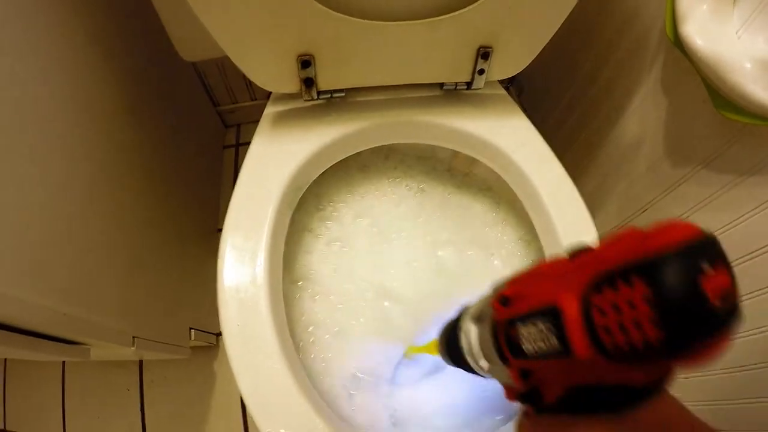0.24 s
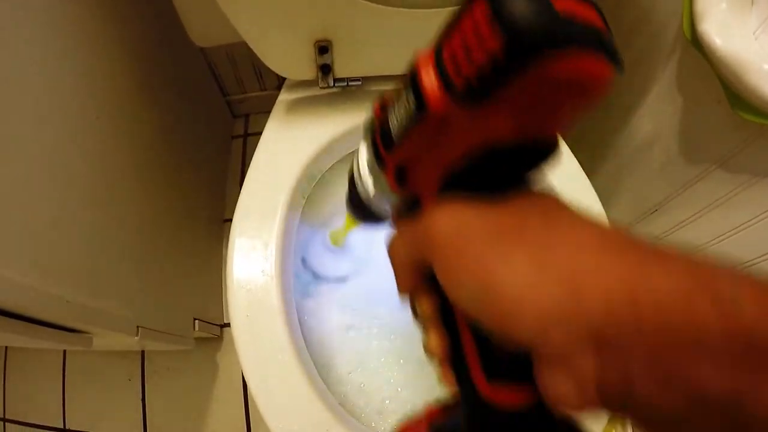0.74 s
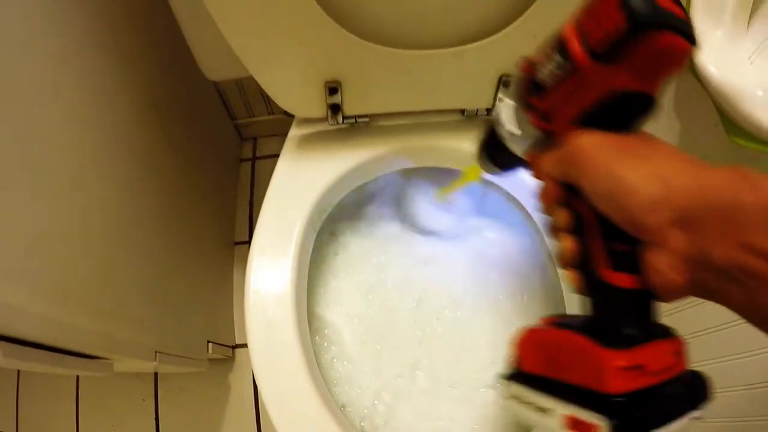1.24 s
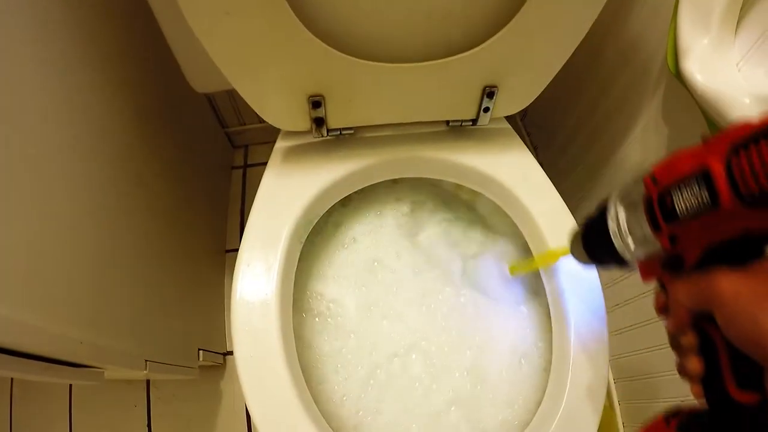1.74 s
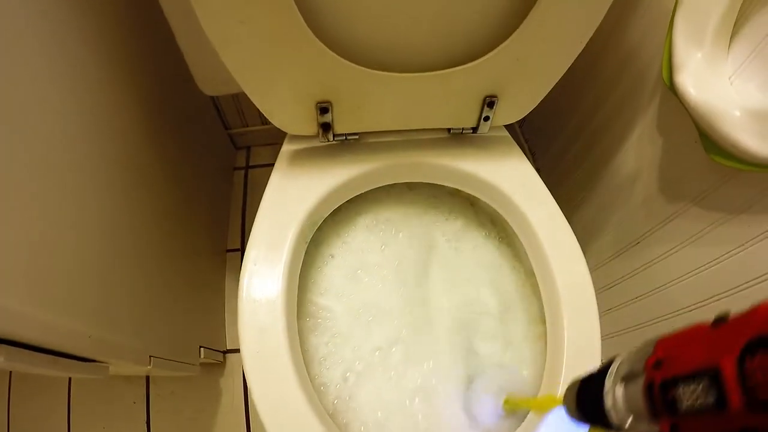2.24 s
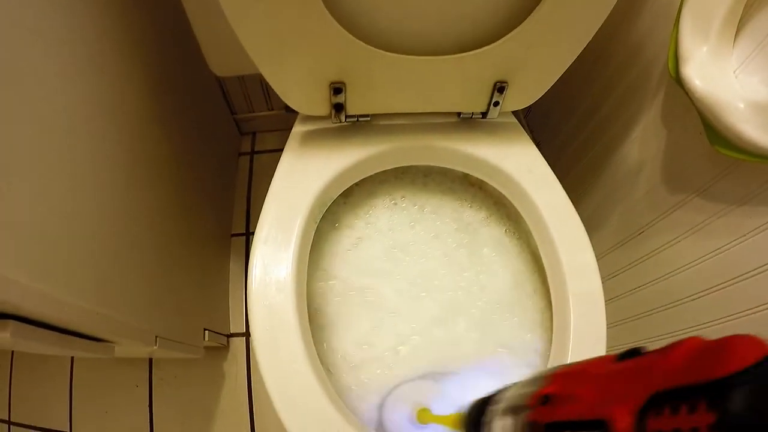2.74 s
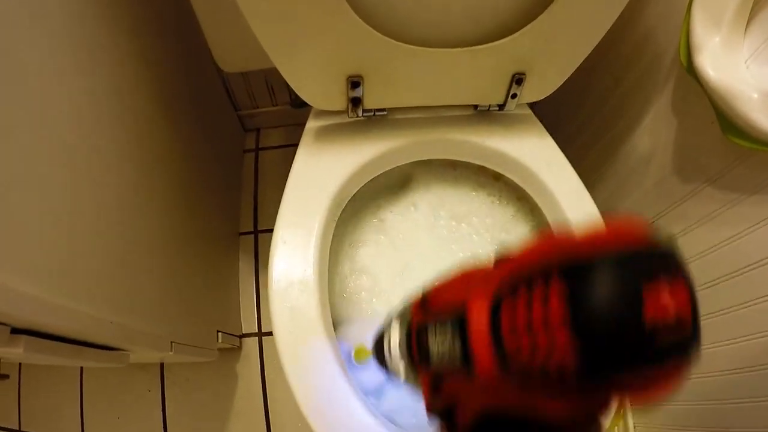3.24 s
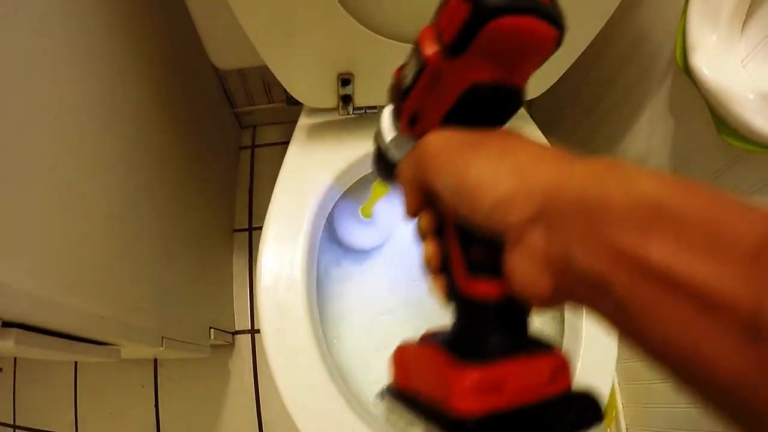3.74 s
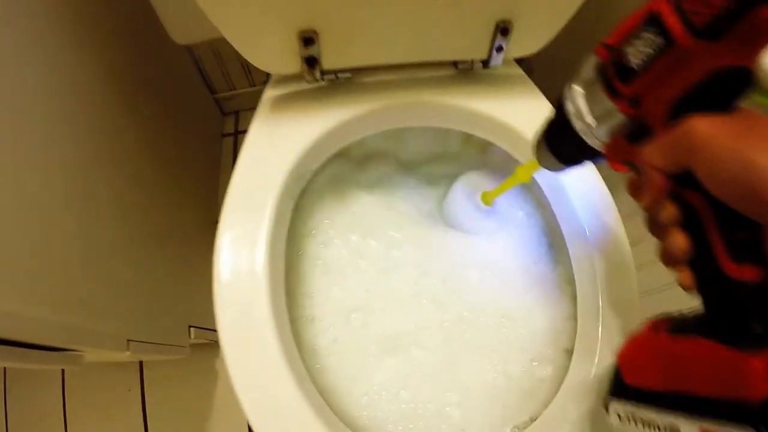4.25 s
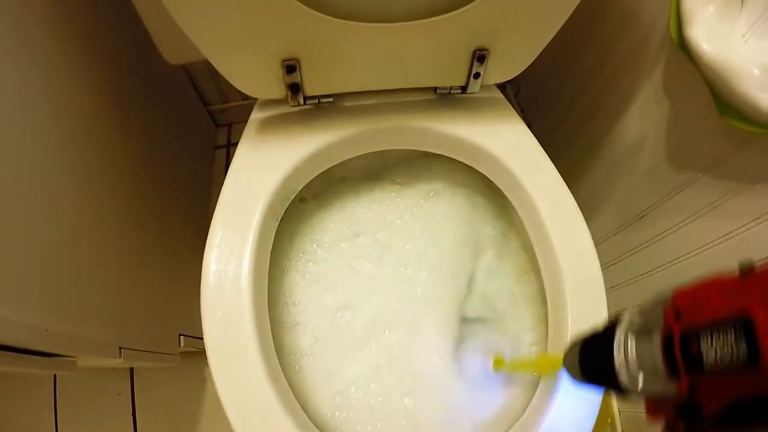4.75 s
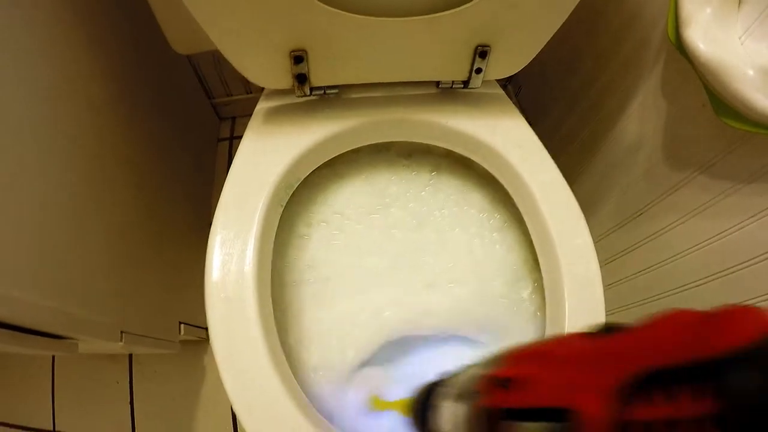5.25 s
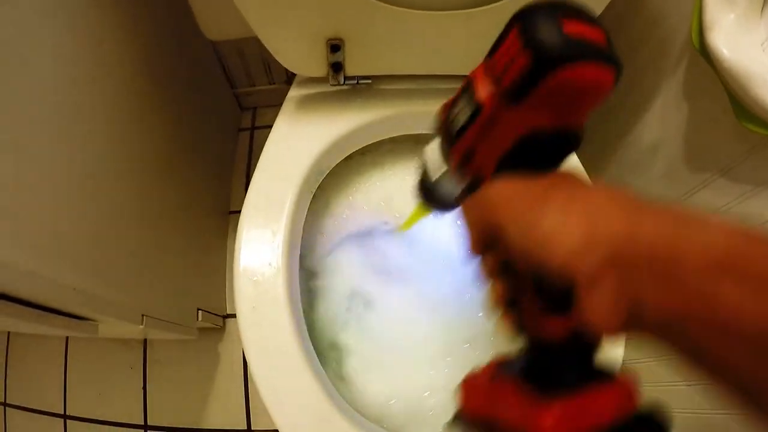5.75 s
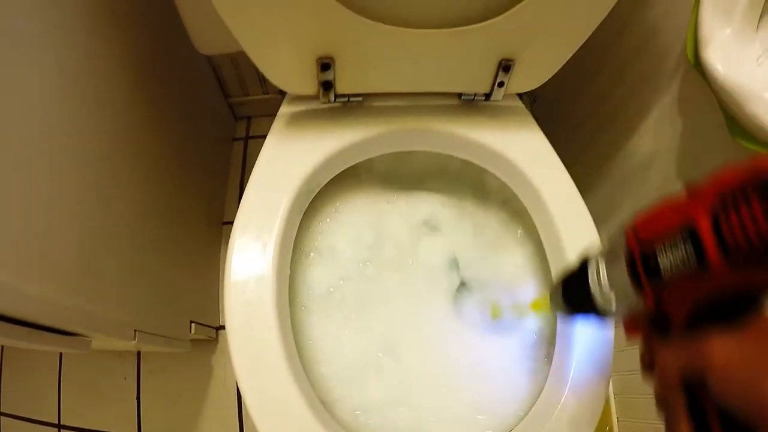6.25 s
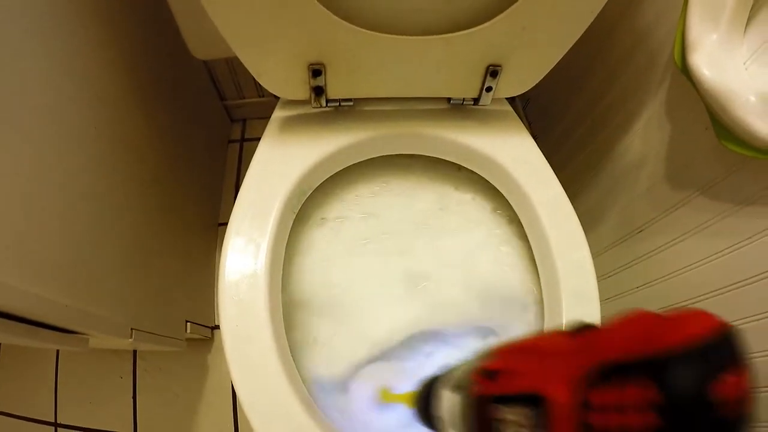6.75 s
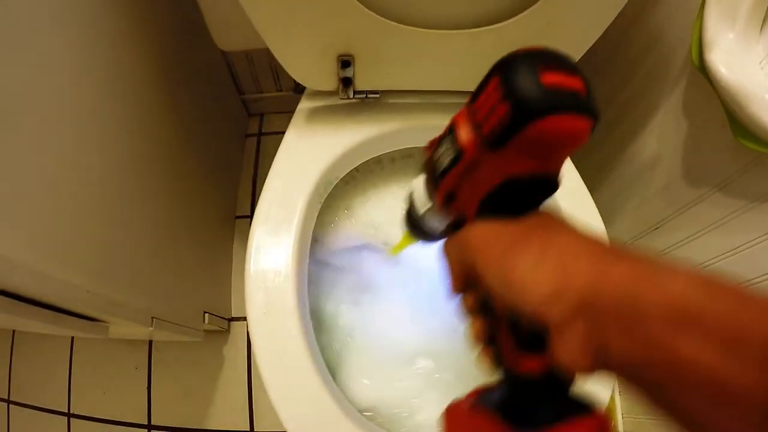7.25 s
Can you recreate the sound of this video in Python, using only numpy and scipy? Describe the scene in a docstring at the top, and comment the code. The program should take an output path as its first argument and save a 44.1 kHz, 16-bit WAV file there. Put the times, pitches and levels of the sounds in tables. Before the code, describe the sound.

A cordless drill whines steadily at high speed over a rough throbbing roar, while foamy water sloshes and gulps in a toilet bowl.

```python
"""The whine of a cordless drill, spinning a brush round a foam-filled toilet bowl, over a broad throbbing roar.
Place: a small bathroom, one microphone. The whine is sines on multiples of the rotor speed, from motor and gears;
the roar of gears, fan and bristles is coloured noise that swells once per brush turn. Water gulps as random
pushes ring the air in the bowl. Behind it lie a low noise rumble that comes and goes, and soft thuds."""
import sys
import numpy as np
from scipy import signal
from scipy.fft import irfft
from scipy.io import wavfile

SR = 44100
rng = np.random.default_rng(int(sys.argv[2]) if len(sys.argv) > 2 else 0)


def master(y):
    """Save y as 16-bit WAV."""
    cut = np.clip(np.atleast_2d(y).T, -1, 1)
    pcm = np.round(cut * 32767)  # scale
    wavfile.write(sys.argv[1], SR, pcm.astype(np.int16))


N = 330750  # 7.5 s

# Rotor speed, sagging when the brush presses on the bowl: (time [s], speed [turns per s])
ROTOR_SPEED = [(0.0, 399.9), (0.25, 407.7), (0.6, 408.5), (0.8, 409.6), (1.05, 402.3), (1.3, 403.1),
               (1.5, 397.0), (1.55, 396.9), (1.75, 401.2), (2.05, 395.8), (2.3, 401.1), (2.55, 399.7),
               (2.7, 404.3), (2.8, 405.8), (3.1, 404.6), (3.3, 409.4), (3.45, 409.7), (4.4, 401.6),
               (4.6, 397.0), (4.7, 399.0), (4.95, 396.8), (5.3, 408.6), (5.5, 406.5), (5.65, 409.0),
               (5.8, 406.8), (6.15, 399.6), (6.55, 397.4), (6.6, 398.4), (6.85, 408.5), (7.25, 407.7),
               (7.45, 404.2)]
# Place of the brush, 0 = near rim, .25 left, .5 far rim, .75 right: (time [s], laps of the bowl [turns])
BOWL_LAP = [(0.0, 0.04), (0.7, 0.29), (1.85, 0.64), (2.7, 1.02), (3.45, 1.16), (4.55, 1.66), (5.2, 2.04),
            (5.95, 2.43), (6.65, 3.01), (7.5, 3.43)]
BRUSH_PER_ROTOR = .0566  # brush turns per rotor turn

# Strongest whines, swelling and dropping out as the drill is swung round.
# Their pitches, gear mesh first, then four of the commutator: (multiples of rotor speed)
STRONG_ORDERS = (5.547, 3, 6, 9, 12)
# Gear mesh, x5.547, before its flicker and pulse: (time [s], level [dB])
GEAR_MESH_LEVEL = [(0.0, -37), (0.65, -28.8), (0.9, -40.8), (1.05, -25), (1.4, -37), (1.6, -28), (2.2, -49),
                   (2.4, -30.8), (2.8, -26), (3.0, -47), (3.6, -28.5), (4.2, -36.5), (6.0, -34.7),
                   (6.25, -47.9), (6.6, -33.5), (7.05, -33), (7.45, -41)]
# Commutator bars, x3, before flicker: (time [s], level [dB])
COMMUTATOR_3 = [(0, -36.5), (.6, -39.5), (1.3, -36.5), (1.84, -30), (1.96, -36), (3.2, -33.5),
                (3.36, -41.5), (4.1, -33.5), (4.55, -33), (5.1, -35.5), (5.54, -40.5), (5.83, -31.5),
                (6.6, -32), (6.85, -45), (7.3, -32.5), (7.5, -36)]
# Commutator bars, x6, before flicker: (time [s], level [dB])
COMMUTATOR_6 = [(0.0, -28.5), (0.65, -22), (1.25, -32), (1.35, -21.5), (1.5, -33), (2.0, -33),
                (2.25, -26.5), (2.75, -31.4), (3.25, -29.8), (3.5, -21), (3.65, -30.5), (4.25, -24.5),
                (4.55, -38.9), (4.7, -26), (5.3, -31.3), (5.65, -27.5), (6.05, -23.5), (6.25, -42),
                (6.35, -23.5), (6.6, -26.8), (6.9, -40.0), (7.15, -23), (7.3, -31.2), (7.45, -25.1)]
# Commutator bars, x9, before flicker: (time [s], level [dB])
COMMUTATOR_9 = [(0.0, -30), (1.65, -36.5), (1.8, -42.2), (2.5, -33.5), (2.55, -29.8), (2.95, -38),
                (3.1, -29.5), (4.85, -39), (4.9, -42), (5.05, -27), (5.2, -37.1), (5.75, -46), (5.8, -32),
                (6.15, -27.5), (6.5, -42), (6.6, -27.5), (6.95, -38), (7.45, -36)]
# Commutator bars, x12, before flicker: (time [s], level [dB])
COMMUTATOR_12 = [(0.0, -27.5), (1.3, -41), (1.4, -34), (1.6, -29.9), (2.25, -35.7), (2.45, -26.5),
                 (2.75, -34.3), (3.55, -34), (3.75, -37), (4.1, -23), (4.35, -35), (4.4, -28.1),
                 (5.05, -26), (5.5, -37.4), (5.6, -30), (5.85, -30), (6.0, -49), (6.15, -26), (6.3, -40),
                 (6.4, -32), (6.75, -30), (7.45, -35.3)]

# Whines that depend on how the drill faces; their pitches: (multiples of rotor speed)
FACING_ORDERS = (1, 13.633, 24, 2.773, 4)
# Their levels, one row per pitch: (mean [dB], swing once a lap [dB], where highest [turn],
# swing twice a lap [dB], where highest [turn])
FACING_LEVELS = [(-48.5, 6.4, 0.3, 1.2, 0.19), (-37, 2.1, 0.81, .6, 0.44), (-41.5, 2.7, 0.67, 3.4, 0.47),
                 (-45, 4, 0.66, .5, 0.22), (-42, 4.5, .12, .5, .1)]
FACING_WAVER_DB = 1  # spread of their chance fading
# Weaker whines of rotor and gears: (multiple of rotor speed, level before a 2 dB cut and chance fading [dB])
FAINT_WHINES = [(2.07, -46), (7.781, -40), (8.086, -39.5), (8.141, -39.5), (8.32, -41), (10.867, -43),
                (13, -42), (15, -42), (18, -45), (19, -46), (21, -42), (27, -45), (30, -46), (31, -49),
                (33, -46),]

# Roar by place in the bowl; rows: level before overall gain, lift near 1 kHz, lift near 6 kHz:
# (mean [dB], swing once a lap [dB], where highest [turn], swing twice a lap [dB], where highest [turn])
ROAR_BY_PLACE = [(-21, 0.14, 0.66, 0.14, 0.23), (-0.5, 2.3, 0.76, 0.24, .06),
                 (-0.04, 0.91, 0.14, 0.13, .21)]
# Relative colour of the roar: (frequency [Hz], density [dB per Hz])
ROAR_SPECTRUM = [(40, -40), (160, -19.5), (300, -23), (450, -13), (900, -6.5), (1900, -5.5), (2500, -3.5),
                 (4000, -3), (5500, -5.5), (6900, -9.5), (10000, -11.5), (12500, -18.5), (15300, -17)]
# Resonances of the drill shell: (frequency [Hz], width [Hz], gain on top [dB])
SHELL_MODES = [(900, 59, 4), (1695, 160, 2.5), (2192, 130, 4.5), (2595, 480, 5.5), (3255, 180, 3),
               (5410, 250, 6.5)]
# Brush running off centre; rows: shake at brush speed, depth of the throb:
# (mean [dB], swing once a lap [dB], where highest [turn], swing twice a lap [dB], where highest [turn])
OFF_CENTRE = [(-49, 4.3, 0.25, 8, 0.427), (0.72, 0.19, .02, 0.32, .46)]
# Hiss near 14 kHz that swells when the fan vents face up: peak level, place and spread
VENT_DB, VENT_TURN, VENT_SPREAD_TURN = -33, 0.62, 0.15

# Water and rumble, levels before a fixed trim in each layer:
# (time [s], slosh [dB], deep slosh near 110 Hz [dB], low rumble [dB])
WATER_AND_RUMBLE = [(0, -33.5, -42, -52), (.58, -34, -34, -49), (.7, -41, -48.5, -51),
                    (1.7, -47.5, -47, -57), (2.6, -46.5, -48.5, -48), (3.2, -45.5, -47, -55),
                    (5.1, -43, -46.5, -55), (5.6, -44.5, -43.5, -50), (5.85, -33.5, -43, -55),
                    (6.5, -36.5, -42.5, -52), (6.9, -42, -50, -49), (7.2, -39, -41, -56),
                    (7.5, -29, -36, -53)]
# Air modes of the bowl: (frequency [Hz], width of the first filter [Hz], relative level [dB])
BOWL_MODES = [(214, 38, -1.5), (264.6, 27, -3.5), (319.5, 66, -1)]
DEEP_HZ, DEEP_WIDTH_HZ = 103, 30
# Single loud gulps: (time, about 2 ms after the envelope peak [s], peak before a 9.5 dB cut [dB], pitch [Hz])
LOUD_GULPS = [(0.159, -19, 320), (0.516, -22, 315), (5.768, -25, 242), (5.905, -15, 319), (6.005, -25, 228),
              (6.321, -21, 324), (6.509, -22, 233), (6.735, -24, 310), (7.263, -26, 312), (7.336, -19, 270)]
# Soft low thuds: (time of peak [s], peak level [dB])
SOFT_THUDS = [(2.443, -26), (4.991, -23), (5.151, -25), (5.218, -29), (6.468, -23), (6.509, -27.5),
              (6.622, -26), (6.692, -32)]
CUTOFF_HZ = 15330


def whine(rotor, fade_db, flicker_db, jitter_rad):
    """Sines locked to a shivering rotor angle; strong and facing gear whines pulse once per brush turn,
    the faint whines only fade by chance."""
    angle = rotor + jitter_rad * drift(23)
    orders = STRONG_ORDERS + FACING_ORDERS
    start = rng.uniform(0, 2 * np.pi, len(FAINT_WHINES) + len(orders))
    # same order as STRONG_ORDERS
    curves = (GEAR_MESH_LEVEL, COMMUTATOR_3, COMMUTATOR_6, COMMUTATOR_9, COMMUTATOR_12)
    strong = [in_time(curve)[0] for curve in curves]
    facing = [db + FACING_WAVER_DB * drift(2.5) for db in round_bowl(FACING_LEVELS)]
    out = np.zeros(N)
    for order, db, phase in zip(orders, strong + facing, start):
        flicker = flicker_db * np.sqrt(order) * drift(8)
        geared = order % 1 > 0  # of these, the gear pitches with broken multiples
        pulse = geared * 3 * throb(rotor)
        out += from_db(db + flicker + pulse) * np.sin(order * angle + phase)
    for (order, db), phase in zip(FAINT_WHINES, start[::-1]):
        out += from_db(db - 2 + fade_db * drift(5)) * np.sin(order * angle + phase)
    return np.sqrt(2) * out  # table levels are rms


def roar(rotor, patchy_db):
    """Gears, fan and bristles: noise in third-octave patches, coloured by the shell, throbbing with the turn."""
    level_db, low_lift_db, high_lift_db = round_bowl(ROAR_BY_PLACE)
    planet_db = .5 * np.cos(8 * BRUSH_PER_ROTOR * rotor)
    commutator_db = 0.37 * np.cos(3 * rotor)
    beat_db = throb(rotor)
    edges = 40 * 2 ** (np.arange(27) / 3)
    grain = rng.standard_normal((2, N))  # neighbouring bands take separate noises
    grain = grain + from_db(-4) * chatter(rotor, fade_db=4, count=10)
    hz_at, db_at = np.transpose(ROAR_SPECTRUM)
    out, neighbour = np.zeros(N), drift(1.2)
    for k, (low, high) in enumerate(zip(edges, edges[1:])):
        hz = np.sqrt(low * high)
        own = drift(1.07)
        db = np.interp(np.log(hz), np.log(hz_at), db_at)
        db = db + patchy_db * (own + neighbour) + 0.75 * drift(15.6)
        db += nearness(hz, 980, 0.06) * low_lift_db
        db += nearness(hz, 5460, 0.64) * high_lift_db
        db += nearness(hz, 2820, 3.8) * beat_db  # the gears throb most
        out += from_db(db) * band(grain[k % 2], low, high)
        neighbour = own
    out = out + sum((from_db(db) - 1) * resonance(out, hz, width_hz) for hz, width_hz, db in SHELL_MODES)
    return from_db(level_db + planet_db + commutator_db + 3.5) * rms_one(out) + vent_hiss()


def nearness(hz, centre_hz, spread):
    """Bell over log frequency, 1 at the centre; spread in octaves squared."""
    return np.exp(-np.log2(hz / centre_hz) ** 2 / spread)


def throb(rotor):
    """The off-centre brush gives a swell once per turn, sharpened on top by a second harmonic, in dB."""
    turn = BRUSH_PER_ROTOR * rotor - 1.6
    return round_bowl(OFF_CENTRE)[1] * (np.cos(turn) + 0.54 * np.cos(2 * turn))


def chatter(rotor, fade_db, count):
    """Tooth errors repeat every brush turn: sets of scattered thin lines, each set fading by chance."""
    turn = BRUSH_PER_ROTOR * rotor / (2 * np.pi) % 1
    steps = (turn * 2 ** 15).astype(int)
    out = np.zeros(N)
    for _ in range(count):
        chosen = rng.random(2 ** 14 + 1) < 1 / 60
        lines = chosen * np.exp(2j * np.pi * rng.random(2 ** 14 + 1))
        lines[660:] = 0  # only multiples of the brush speed below 660
        one_turn = irfft(lines)
        out += from_db(fade_db * drift(3.0)) * one_turn[steps]
    return rms_one(out)


def vent_hiss():
    """Fan air: narrow noise near 14 kHz, swelling once a lap when the vents face up."""
    hiss = resonance(resonance(rng.standard_normal(N), 14000, 2000), 14000, 2000)
    off_turn = in_time(BOWL_LAP)[0] % 1 - VENT_TURN
    swell = from_db(VENT_DB) * np.exp(-(off_turn / VENT_SPREAD_TURN) ** 2)
    return swell * rms_one(hiss)


def water(per_s):
    """Air pockets under the foam push the air in the bowl, which rings in its modes; a few gulp loudly."""
    slosh_db, deep_db, _ = in_time(WATER_AND_RUMBLE)
    # sparse random impulses in four rows; the tiny offset avoids silence
    pushes = rng.standard_normal(N) * (rng.random((4, N)) < per_s / SR) + 1e-18
    slosh = np.zeros(N)
    for push, (hz, width_hz, db) in zip(pushes, BOWL_MODES):
        slosh += from_db(db) * rms_one(ring(push, hz, width_hz))
    deep = ring(pushes[-1], DEEP_HZ, DEEP_WIDTH_HZ)
    out = from_db(slosh_db - 2.5) * rms_one(slosh) + from_db(deep_db - 3.5) * rms_one(deep)
    seconds = np.arange(SR // 10) / SR
    age = seconds / 0.01  # in units of the 10 ms swell time
    for s, db, hz in LOUD_GULPS:
        at = round(s * SR - .012 * SR)
        gulp = from_db(db - 9.5) * age * np.exp(1 - age) * np.sin(2 * np.pi * hz * seconds)
        out[at:at + len(age)] += gulp[:N - at]
    return out


def ring(push, hz, width_hz):
    """An air mode as two resonances in a row, the second twice as wide."""
    return resonance(resonance(push, hz, width_hz), hz, 2 * width_hz)


def rumble(rotor):
    """The off-centre brush shakes at its own speed, over low noise and soft thuds of one slow cycle."""
    shake = np.sqrt(2) * from_db(round_bowl(OFF_CENTRE)[0]) * np.sin(BRUSH_PER_ROTOR * rotor)
    low_noise = rms_one(band(rng.standard_normal(N), 13, 71))
    out = shake + from_db(in_time(WATER_AND_RUMBLE)[2] + 1.0) * low_noise
    u = np.arange(-2000, 2000) / SR / 0.0069  # in units of 6.9 ms
    for s, db in SOFT_THUDS:
        at = round(s * SR) - 2000
        out[at:at + len(u)] += from_db(db) * (1 - u ** 2) * np.exp(-u ** 2 / 2)
    return out


def round_bowl(rows):
    """Quantities that rise and fall with the place of the brush in the bowl."""
    lap = 2 * np.pi * in_time(BOWL_LAP)[0]
    return [mean + once * np.cos(lap - 2 * np.pi * at) + twice * np.cos(2 * lap - 4 * np.pi * at2)
            for mean, once, at, twice, at2 in rows]


def in_time(rows):
    """Columns of a table after its time column, one value per sample."""
    s, *columns = np.transpose(rows)
    return [np.interp(np.arange(N) / SR, s, c) for c in columns]


def drift(rate_hz):
    """Slow chance: coarse noise through a double one-pole low-pass, spread 1."""
    r = np.exp(-80 * np.pi * rate_hz / SR)  # one coarse step is 40 samples
    noise = rng.standard_normal(N // 40 + 2002)
    slow = signal.lfilter([1], [1, -2 * r, r * r], noise)[2000:]  # drop the filter's run-in
    return np.interp(np.arange(N) / 40, np.arange(len(slow)), rms_one(slow - slow.mean()))


def resonance(x, hz, width_hz):
    """Two-pole band-pass, gain 1 on top."""
    r = np.exp(-np.pi * width_hz / SR)
    poles = [1, -2 * r * np.cos(2 * np.pi * hz / SR), r * r]
    return signal.lfilter([(1 - r * r) / 2, 0, (r * r - 1) / 2], poles, x)


def band(x, low_hz, high_hz):
    """Butterworth band-pass."""
    return signal.sosfilt(signal.butter(2, [low_hz, high_hz], "band", fs=SR, output="sos"), x)


def from_db(db):
    """Decibels to gain."""
    return np.exp(np.asarray(db) * (np.log(10) / 20))


def rms_one(x):
    """Scale to rms 1."""
    return x / np.sqrt(np.mean(x ** 2) + 1e-20)


def scene():
    """Drill, water and rumble at one microphone, the same sound in both channels."""
    rotor = 2 * np.pi * np.cumsum(in_time(ROTOR_SPEED)[0]) / SR  # rotor angle in radians
    drill = whine(rotor, fade_db=4.5, flicker_db=.45, jitter_rad=.012)
    drill = drill + roar(rotor, patchy_db=.5)
    mono = drill + water(per_s=100) + rumble(rotor)
    return np.array([mono, mono])


def record(dry):
    """A steep elliptic low-pass cuts the top."""
    return signal.sosfilt(signal.ellip(14, .3, 75, CUTOFF_HZ, fs=SR, output="sos"), dry)


dry = scene()
out = record(dry)
master(out)
```